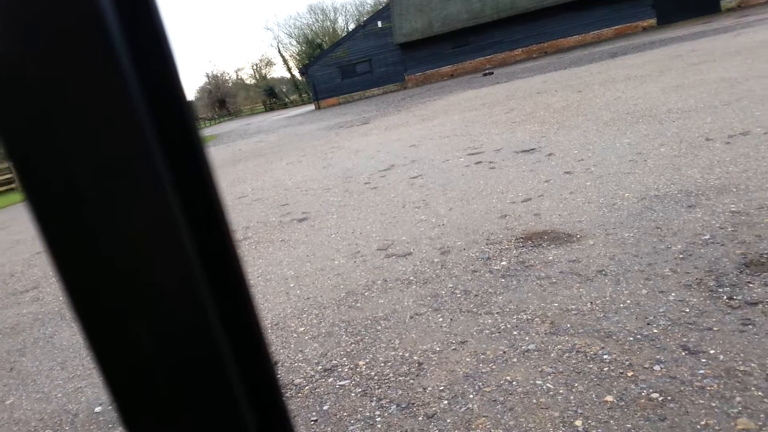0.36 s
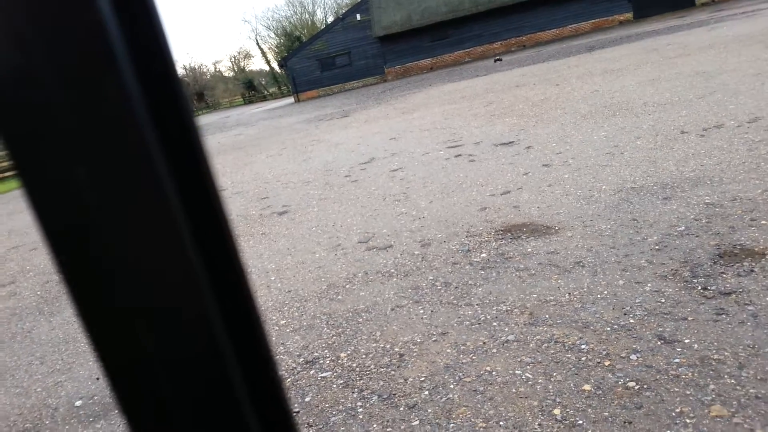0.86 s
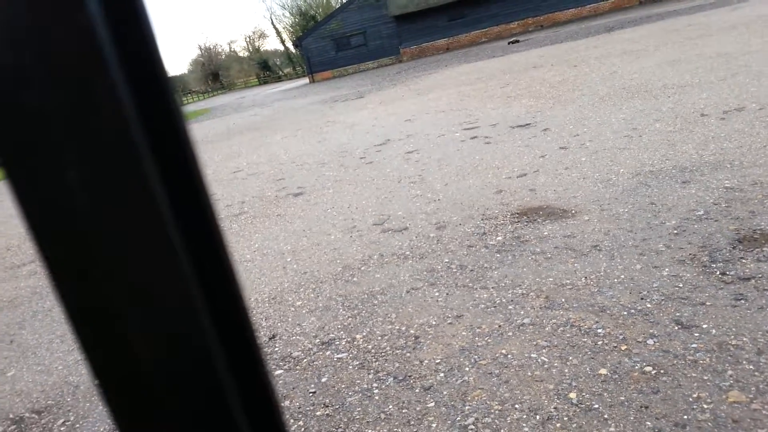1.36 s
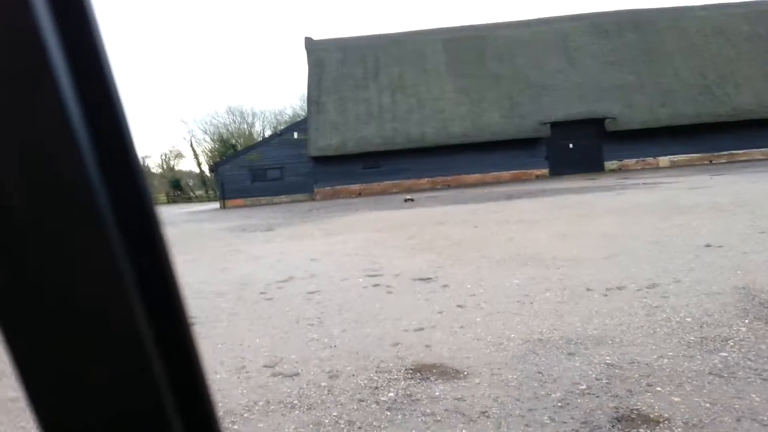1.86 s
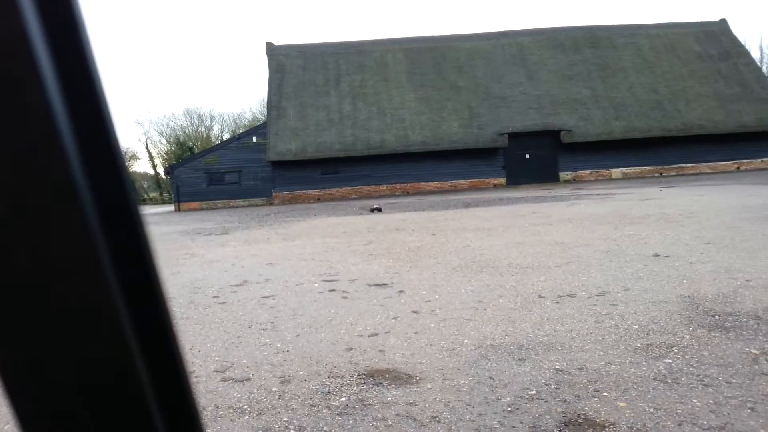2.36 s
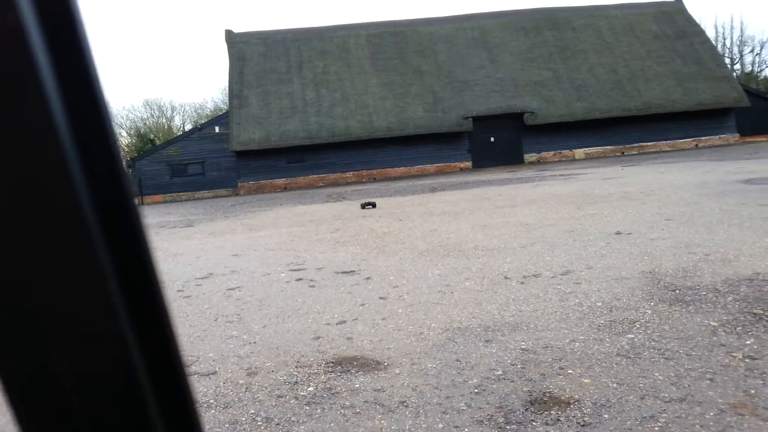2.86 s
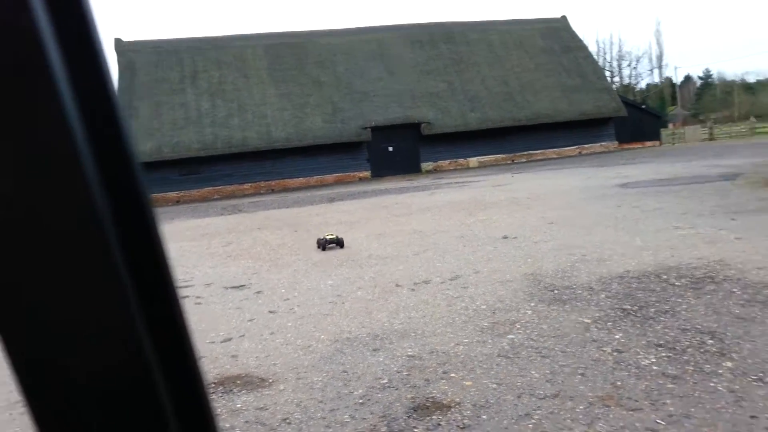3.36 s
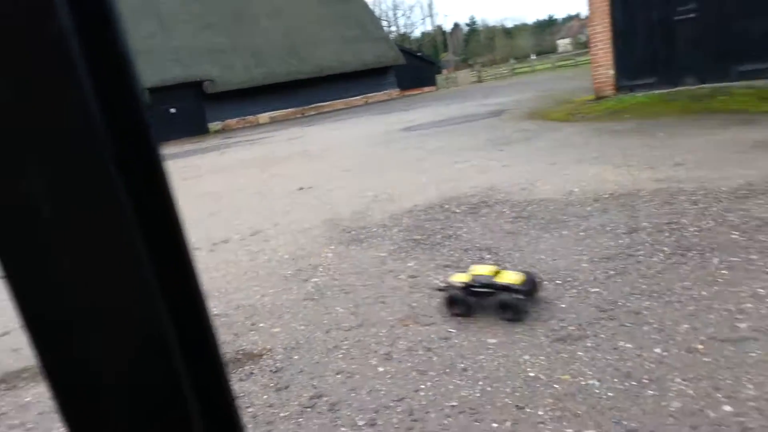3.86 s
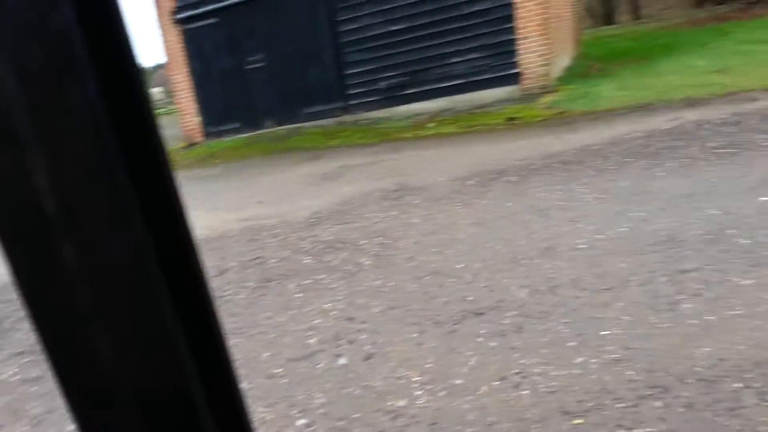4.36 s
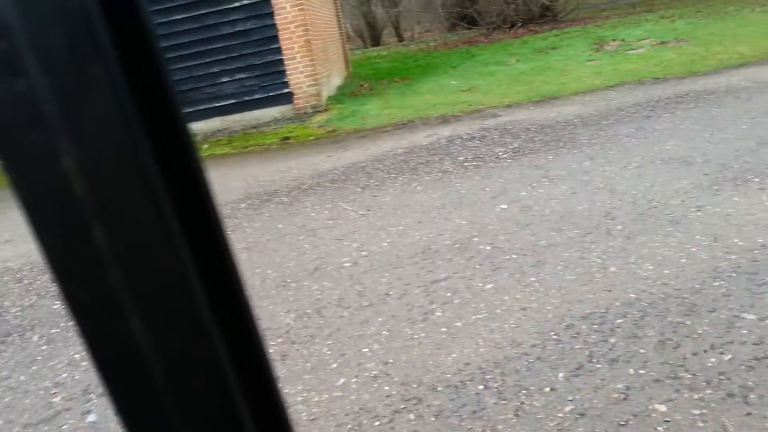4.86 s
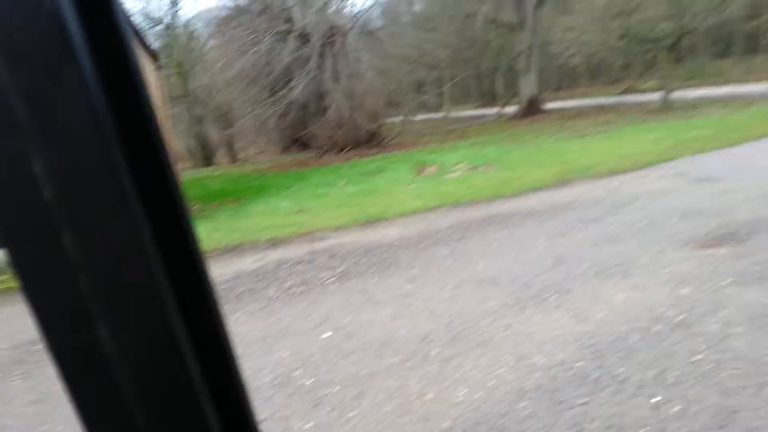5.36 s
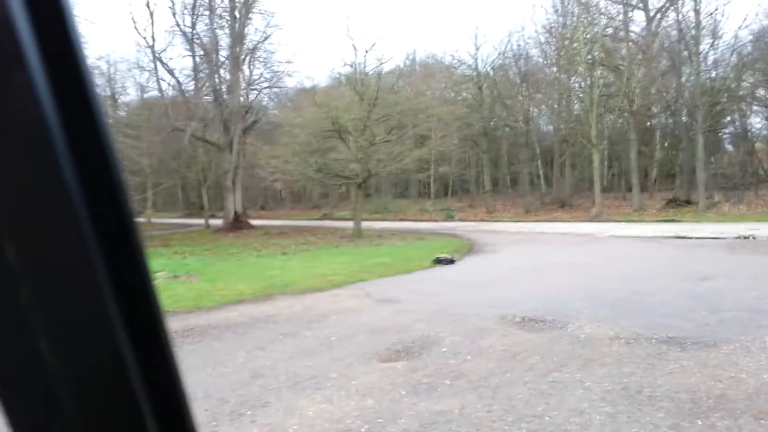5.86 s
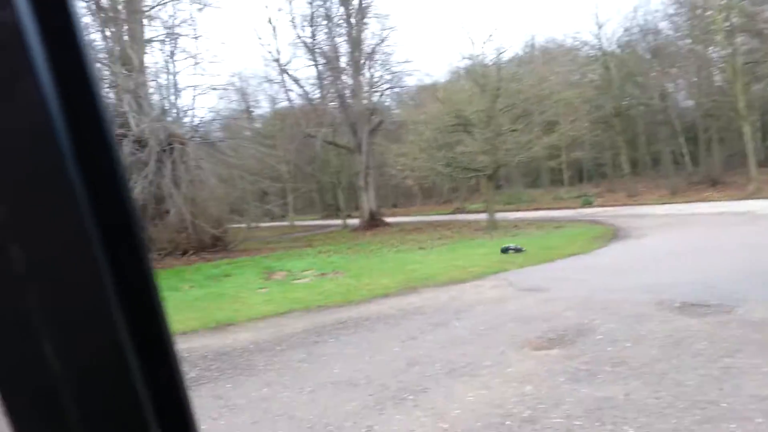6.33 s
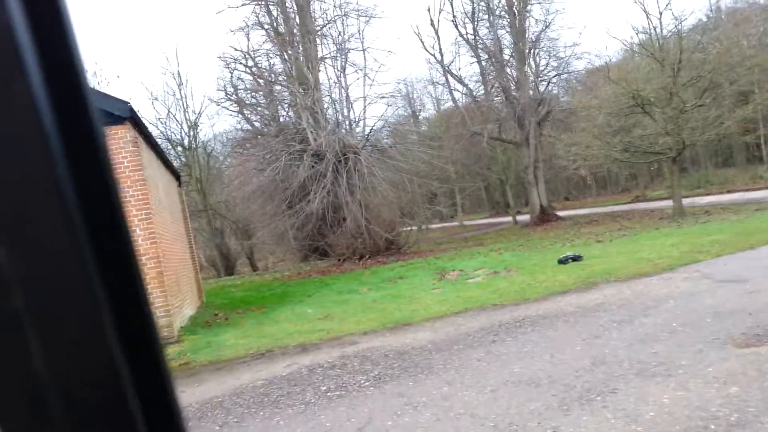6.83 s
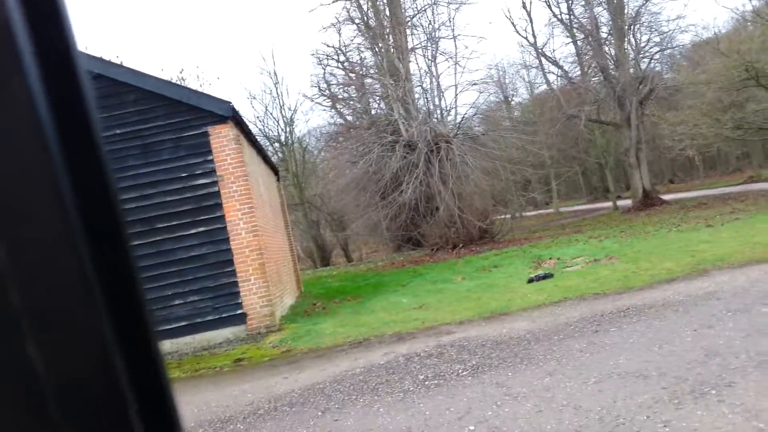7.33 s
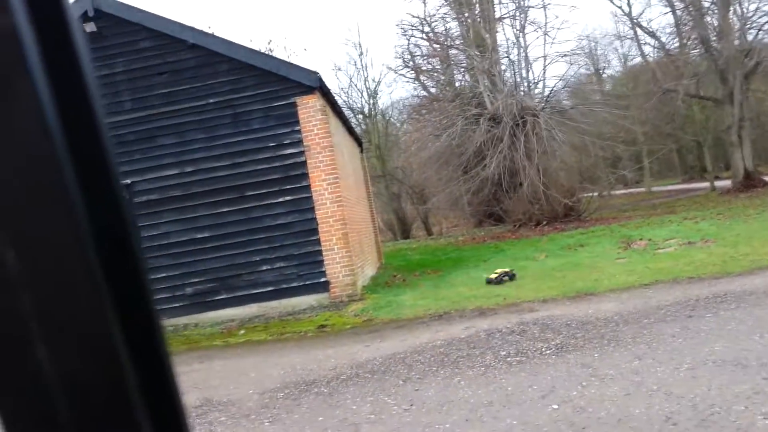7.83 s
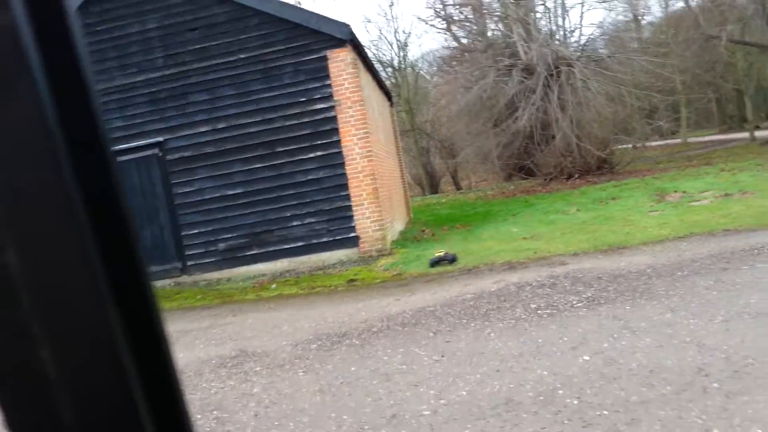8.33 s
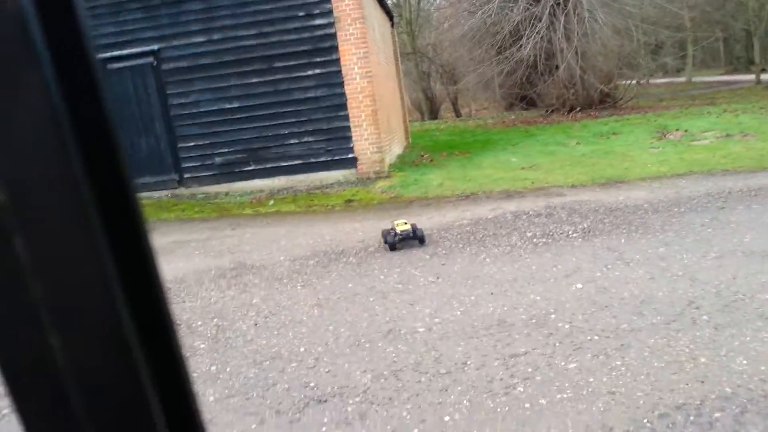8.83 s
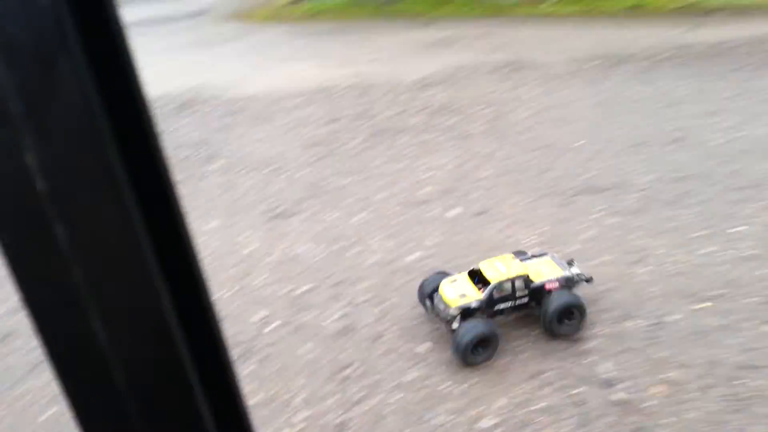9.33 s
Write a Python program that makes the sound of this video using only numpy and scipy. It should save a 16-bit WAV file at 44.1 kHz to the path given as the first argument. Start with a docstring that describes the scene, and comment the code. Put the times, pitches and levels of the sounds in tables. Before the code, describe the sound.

Small electric toy truck laps a gravel yard outdoors, tyres grinding stones, plastic body rattling, gears whining, wind puffing on the microphone.

```python
"""Toy truck on a gravel yard

A remote-controlled toy truck laps a gravel yard, passes close to a hand-held phone, turns on grass and comes back.
Tyres crunch stones as filtered cracks and noise; bumps knock the plastic body and set off a dying rattle.
Gear whines and rough sliding bands are wavering tones; clicks and faint high hiss are short rings in noise.
Light wind rumbles and puffs on the two microphones, and the hand round them colours their sound."""
import sys
import numpy as np
from scipy import signal
from scipy.fft import rfft, irfft, next_fast_len
from scipy.io import wavfile
from scipy.ndimage import uniform_filter1d

SR = 44100
rng = np.random.default_rng(int(sys.argv[2]) if len(sys.argv) > 2 else 0)


def inscribe(sig):
    """Save sig as 16-bit PCM at rate SR to the path in sys.argv[1].

    A 1-D sig is mono; a 2-D sig holds one channel per row.
    Samples are clipped to [-1, 1] before scaling.
    """
    pcm = np.round(np.clip(np.atleast_2d(sig).T, -1, 1) * 32767)
    wavfile.write(sys.argv[1], SR, pcm.astype(np.int16))


def invert_db(level):
    """Linear amplitude ratio for a level in decibels (20 dB per decade), elementwise."""
    return 10 ** (np.asarray(level, dtype=float) / 20)


N = 427769

# spectrum of grit, for tyres and rattles: f/Hz, relative density/dB per Hz
GRIT_SPECTRUM = [(40, -61), (100, -71), (180, -3), (270, 2), (370, -5.5), (520, 2.5), (760, 1), (1000, 3.5),
                 (2600, -1.5), (4000, -10.5), (7000, -27.5), (9000, -33), (12000, -36.5), (15000, -47)]


def evened(x):
    """Scales to rms 1."""
    return x / np.sqrt(np.mean(x ** 2) + 1e-20)


def read(points, hz):
    """Reads a spectrum on a log-frequency axis."""
    f, value = np.transpose(points)
    return np.interp(np.log(hz + 1), np.log(f + 1), value)


def add(mix, s, sound):
    """Mixes a sound in at time s."""
    part = mix[..., round(s * SR):][..., :sound.shape[-1]]
    part += sound[..., :part.shape[-1]]


def band(x, lo_hz, hi_hz):
    """Band-pass."""
    return signal.sosfilt(signal.butter(2, [lo_hz, hi_hz], "band", fs=SR, output="sos"), x)


def drift(shape, span):
    """Slow random wander of rms 1, smoothed twice over span samples."""
    return evened(uniform_filter1d(uniform_filter1d(rng.standard_normal(shape), span), span))


def spectra(x):
    """Short-time spectra: frequencies, times, complex values."""
    return signal.stft(x, SR, nperseg=512, noverlap=384)


def air(same=0.057):
    """Far country murmur and microphone hiss: shaped noise, nearly unrelated in the two ports."""
    # spectrum of the open air: f/Hz, relative density/dB per Hz
    murmur = [(18, -50), (30, -20), (147, -8), (460, -3), (928, -2.5), (1340, -8.5), (1600, -12),
              (4900, -21.5), (13900, -23), (15000, -35)]
    noise = rng.standard_normal((3, N))
    noise = noise[:2] + same * noise[2]
    size = next_fast_len(N)
    f = np.fft.rfftfreq(size, 1 / SR)
    shaped = irfft(rfft(noise, size) * invert_db(read(murmur, f)), size)[:, :N]
    return invert_db(-44.5) * evened(shaped)


def buffet():
    """Very low pressure swings of the breeze: low-band noise, unrelated in the two ports."""
    # slow buffeting on the microphones: t/s, level/dB
    swells = [(0, -62), (3.15, -76), (3.38, -38), (3.48, -59), (3.73, -41.5), (5.3, -52), (6.18, -50),
              (6.5, -54), (7.94, -58), (8.11, -48), (8.45, -53), (9.7, -54)]
    s, db = np.transpose(swells)
    noise = band(rng.standard_normal((2, N)), 54, 180)
    return evened(noise) * invert_db(np.interp(np.arange(N) / SR, s, db))


def wind(lumpy_db=4, swing_db=5):
    """Lumpy low rumble, unrelated in the two ports, and single dying puffs of air."""
    # breeze on the ports: t/s, rumble level before swing and lean/dB
    breeze = [(5.3, -57), (5.39, -34), (5.7, -48), (5.83, -28.5), (5.97, -61), (6.21, -37), (6.5, -49),
              (6.94, -50), (7.4, -46), (8.05, -61), (8.3, -40), (8.35, -47)]
    # puffs on a port: t/s, peak averaged over the ports/dB, f/Hz, left re right/dB, length/cycles
    gusts = [(5.437, -19, 267, -9, 2), (5.468, -20, 223, -23, 0.9), (5.476, -19, 196, -23, 1.2),
             (5.489, -16, 275, -22, 1.2), (5.511, -5, 280, -34, 1.3), (5.525, -11, 261, 6, 1.4),
             (5.547, -9.5, 245, -26, 1.3), (5.793, -24, 269, 5, 2.7), (5.87, -13, 181, -10, 0.52),
             (5.908, -16.5, 240, -22, 0.92), (5.922, -15, 382, -25, 0.6), (5.951, -10, 327, -36, 1.5),
             (6.252, -24, 345, -21, 1.9), (6.314, -25, 300, -26, 2), (6.952, -20, 155, 13, 0.53),
             (7.228, -22.5, 240, 27, 1.06), (7.27, -23.5, 263, -28, 0.88), (7.555, -24, 192, -23, 0.9),
             (8.043, -33, 149, 24, 1.4), (8.115, -29, 135, -13, 1.4), (8.221, -28, 145, 9, 1.3),
             (8.258, -17, 304, 21, 1.1), (8.299, -28, 215, 21, 1.1)]
    s, db = np.transpose(breeze)
    level = np.interp(np.arange(N) / SR, s, db, -90, -90)
    level = level + swing_db * drift((2, N), 3000) + [[-3], [2.5]]  # leans to the right port
    lumps = invert_db(lumpy_db * drift((2, N), 600))
    mix = evened(band(rng.standard_normal((2, N)), 100, 265) * lumps) * invert_db(level)
    for s, db, hz, pan_db, cycles in gusts:
        cycles = max(cycles, .5)
        u = np.arange(int(cycles * 3 / hz * SR)) / SR * hz  # time in cycles
        puff = np.sin(2 * np.pi * u) * u * np.exp(-2.5 * u / cycles)
        gains = invert_db([pan_db / 2, -pan_db / 2])
        add(mix, s, np.outer(2 * gains / gains.sum(), invert_db(db) * puff / abs(puff).max()))
    return mix


def clicks_and_hiss():
    """Clicks and faint swells of very high hiss: a short dying ring inside a band of noise."""
    # short sounds, levels ahead of the ports: t/s, peak level/dB, f/Hz, t60/s
    shorts = [(1.1794, -28, 4720, .02), (3.845, -32, 13500, .03), (4.05, -28, 12500, .06),
              (4.175, -34, 13000, .05), (4.29, -31, 13000, .05), (6.163, -30, 3600, .02),
              (7.181, -31, 1300, .02), (7.236, -32, 2200, .025), (7.82, -40, 13500, .03),
              (8.41, -40, 13500, .04), (9.6135, -3, 5000, .018)]
    mix, t = np.zeros(N), np.arange(3000) / SR
    for s, db, hz, t60 in shorts:
        noise = evened(band(rng.standard_normal(len(t)), .75 * hz, min(1.8 * hz, 15000)))
        decay = invert_db(-60 * t / max(t60, .005))
        attack = np.minimum(t / (.07 * t60), 1)
        ring = (np.sin(2 * np.pi * hz * t) + noise) * decay * attack
        add(mix, s, invert_db(db) * ring / abs(ring).max())
    return mix


def whines(flutter_db=2.5, rasp=.55, slip=.7, lost_db=-10, grip=.7, slide_db=-.25, snatch=1.6, snatch_hz=27):
    """Gear whines and rough sliding bands, as tones that warble, sag at random and rasp."""
    # one table a tone or band; several may sound together. The last two stand for rough, sliding bands
    # of tyre noise coloured by a ground echo. Levels before flutter: t/s, f/Hz, level/dB
    tones = [
        [(.54, 959, -57), (.625, 1090, -33), (.665, 1300, -36), (.71, 1983, -29), (.78, 2386, -40),
         (.84, 2620, -41), (.89, 1960, -28), (.955, 2450, -38), (1.12, 2260, -51), (1.16, 2263, -33),
         (1.2, 2410, -60), (1.4, 2890, -41)],
        [(2.2, 3150, -43), (2.4, 4400, -45), (2.46, 4160, -43), (2.51, 4620, -54), (2.62, 3800, -37),
         (2.72, 4700, -45), (3.12, 5050, -52)],
        [(2.9, 1348, -29), (3.13, 1354, -33.5), (3.27, 1442, -24.5), (3.334, 1475, -18.5), (3.4, 1540, -29)],
        [(5.92, 1352, -44), (6.15, 1285, -27.5), (6.232, 1810, -29.5), (6.27, 1576, -30), (6.344, 1818, -31.5),
         (6.43, 1884, -28.5), (6.455, 1900, -40)],
        [(6.47, 2220, -42), (6.57, 2300, -49), (6.64, 2830, -58), (6.8, 3070, -40.5), (6.85, 3430, -50),
         (6.885, 2930, -39), (7.03, 2850, -53)],
        [(6.5, 5200, -57), (6.76, 5450, -54), (7.03, 5580, -59)],
        [(6.7, 653, -48), (6.73, 705, -30.5), (6.8, 709, -41), (6.86, 867, -36), (6.94, 850, -58)],
        [(7.36, 1700, -45), (7.425, 2850, -44), (7.47, 2480, -48), (7.52, 2970, -45), (7.6, 2674, -38.5),
         (7.69, 3570, -44), (7.74, 2870, -37.5), (7.8, 3500, -38), (7.84, 3000, -48), (7.92, 2500, -57)],
        [(8.27, 1980, -36), (8.328, 2500, -31), (8.36, 3400, -33), (8.38, 3900, -36), (8.405, 3800, -40),
         (8.425, 4250, -35), (8.477, 3500, -35), (8.497, 3950, -40), (8.518, 3550, -33), (8.555, 4200, -35),
         (8.582, 3600, -30), (8.612, 4220, -29), (8.64, 4500, -35), (8.69, 5050, -34)],
        [(9.2, 3700, -41), (9.235, 3970, -22), (9.33, 3990, -29), (9.38, 3700, -48), (9.45, 3500, -46),
         (9.55, 3693, -47), (9.62, 3600, -26), (9.7, 3480, -38)],
        [(9.2, 2144, -35), (9.3, 2055, -21), (9.45, 2320, -24), (9.59, 2450, -15.5), (9.7, 2250, -33)],
    ]
    # for each tone: lower neighbour re main tone/dB, octave re main tone/dB, scale of the pitch wobble/share
    strands = [(-16, -24, 0.02), (-7, -20, 0.0108), (-18, -48, 0.0071), (-10.5, -23, 0.011),
               (-23.5, -14, 0.0244), (-25, -40, 0.023), (-29, -4.5, 0.02), (-13, -10, 0.0225),
               (-4.5, -12, 0.01184), (-13, -16, 0.04), (-3.5, -41, 0.042)]
    mix = np.zeros(N)
    for rows, (pair_db, octave_db, wobble) in zip(tones, strands):
        s, hz, db = np.transpose(rows)
        t = np.arange(s[0], s[-1], 1 / SR)
        warble = snatch * np.sin(2 * np.pi * snatch_hz * t + drift(len(t), 3000))
        waver = wobble * (drift(len(t), 200) + slip * drift(len(t), 600) + warble)
        turns = np.cumsum(np.interp(t, s, hz) * (1 + waver)) / SR
        loose = np.clip(2 * (drift(len(t), 350) - grip), 0, 1)  # 1 = fully sagged
        shake = invert_db(flutter_db * drift(len(t), 500) + lost_db * loose)
        shake *= 1 + rasp * drift(len(t), 70)
        slide = abs(np.gradient(np.interp(t, s, np.log2(hz)), t))  # octaves a second
        shake *= invert_db(slide_db * slide)  # fainter while the pitch slides
        orders = (.665, pair_db), (1, 0), (2, octave_db)  # (pitch ratio, dB)
        tone = sum(invert_db(d) * np.sin(2 * np.pi * k * turns) for k, d in orders)
        fade = signal.windows.tukey(len(t), .06)
        add(mix, s[0], tone * shake * invert_db(np.interp(t, s, db)) * fade)
    return np.sqrt(2) * mix


def bumps(cycles=0.77, rattle_t60_s=0.13):
    """Each bump is a dead plastic knock, dying within a few cycles, and a short dying rattle."""
    # wheels hitting stones and ruts, levels ahead of the ports:
    # t/s, knock peak/dB, knock f/Hz, rattle setting re knock/dB, rattle tilt/dB per octave
    hits = [(0.383, -26, 1080, 0, -2), (1.677, -17.5, 1590, -14, 2), (1.92, -22, 2160, 2, -3.5),
            (2.31, -24, 2300, 4.5, -1), (2.559, -17, 2300, -15, 5), (3.191, -22.5, 2400, 4.5, -2),
            (3.61, -4, 1450, -4, -0.5), (4.726, -7, 2750, -8.5, 6.5), (4.877, -29, 2550, 5, 4),
            (5.035, -14.5, 2550, 3, 0), (5.232, -17, 2400, 3, -1), (5.391, -26.5, 2000, 6.5, 1.5),
            (5.5, -29, 2400, -5, 13), (5.953, -11, 610, -23, -15), (6.162, -18, 942, -22, 5),
            (6.451, -33.5, 902, 14.5, -3), (6.641, -17.5, 960, -8.5, 2), (6.842, -27, 837, -12, 11),
            (7.18, -32, 1200, -3, -11), (7.233, -29, 900, -9, 2), (7.357, -33.5, 690, 6, -1),
            (7.629, -16, 990, -20, 8), (7.752, -16, 1020, -17, 11), (7.836, -10, 835, -15.5, 1),
            (7.857, -20, 953, -20, -5), (7.887, -22.5, 795, -7, 6), (8.249, -22, 1030, -7, 8),
            (8.311, -18, 2420, -9.5, 13), (8.509, -16, 990, -7.5, 22), (8.631, -12.5, 1080, -4.5, 7),
            (8.695, -9, 2610, 4.5, 4), (8.959, -11, 1200, 2, -5), (9.151, -9, 1510, 1.5, 3.5),
            (9.278, -1, 1020, -6.5, 5)]
    mix, t = np.zeros(N), np.arange(6000) / SR
    f = np.fft.rfftfreq(len(t), 1 / SR)
    for (s, db, hz, rattle_db, tilt_db), noise in zip(hits, rng.standard_normal((len(hits), len(t)))):
        knock = np.sin(2 * np.pi * hz * t) * hz * t * np.exp(-hz * t / cycles)
        colour = invert_db(read(GRIT_SPECTRUM, f) + tilt_db * np.log2((f + 200) / 1000))
        rattle = evened(irfft(rfft(noise) * colour, len(t))) / 2
        rattle = rattle * invert_db(rattle_db - 60 * t / rattle_t60_s) * np.minimum(t / 0.0021, 1)
        add(mix, s, invert_db(db) * (knock / abs(knock).max() + rattle))
    return mix


def tyres(stones_per_s=2500, spread_db=3.0, rush=0.99, judder_db=1.5, patchy_db=2.0, lurch_db=0.85):
    """Stones crack at random under the tyres over a dense rush; returns short-time spectra."""
    # where rumble, body, crunch and hiss hand over: f/Hz
    split_hz = (400, 1400, 3300)
    # colour of the ground under the wheels:
    # t/s, crunch re body knock/dB, stone hiss re loudness/dB, ground rumble re loudness/dB
    ground = [(0, -1, -27, -6.5), (2.1, 5, -28, -7.5), (2.4, 6, -16, -9), (3.3, 3, -4.5, -12),
              (3.83, 3.5, -13, -13), (4.05, -2, -12, -11.5), (4.3, 4, -7, -6), (4.7, -2.5, -3.5, -0.5),
              (5.1, -0.5, -9.5, -7), (5.7, -3, -16.5, -12.5), (6.2, -11.5, -18.5, -36),
              (7.0, -21, -15, -22), (7.3, -19, -20.5, -26), (7.7, -29, -6, -28), (8.2, -8, -22, -7),
              (8.35, -4.5, -8.5, -22.5), (8.9, 4.5, -8.5, -9), (9.3, 1, -11.5, -11), (9.7, -11.5, -6.5, -6)]
    # loudness as the truck nears, leaves, slows and speeds up, ahead of the ports: t/s, level/dB
    roll = [(0, -36), (.23, -35.5), (.55, -40.5), (.72, -36.5), (1.12, -33.5), (1.4, -35), (3.28, -27),
            (3.34, -20.5), (3.53, -24), (3.84, -13.5), (4.1, -15.5), (4.69, -30.5), (4.74, -22.5),
            (4.81, -28), (5.46, -30.5), (5.52, -25.5), (5.81, -35.5), (5.95, -30.5), (6.01, -35.5),
            (6.2, -34.5), (6.6, -34.5), (7.03, -34.5), (7.1, -37), (7.34, -45.5), (7.38, -36),
            (7.62, -29.5), (7.71, -32), (7.83, -27.5), (7.93, -36), (8.22, -49.5), (8.27, -31.5),
            (8.68, -26), (8.71, -17.5), (8.91, -19.5), (9.05, -22), (9.16, -14), (9.31, -11.5),
            (9.7, -16.5)]
    size = invert_db(spread_db * np.minimum(rng.exponential(1, N), 5)) * rng.choice([-1., 1.], N)
    cracks = size * (rng.random(N) < stones_per_s / SR)
    drive = evened(cracks) + rush * rng.standard_normal(N)
    drive = drive * invert_db(judder_db * drift(N, 500))  # the chassis bounces
    hz, t, z = spectra(evened(drive))
    s, *columns = np.transpose(ground)
    crunch_db, hiss_db, rumble_db = (np.interp(t, s, c) for c in columns)
    body = 1 / np.sqrt(1 + invert_db(crunch_db) ** 2)  # knock and crunch share the loudness
    shares = [invert_db(rumble_db), body, body * invert_db(crunch_db), invert_db(hiss_db)]
    above = [1, *(1 / (1 + (f / (hz + 1)) ** 6) for f in split_hz), 0]
    edges = (120, *split_hz, 7500)
    grit = invert_db(read(GRIT_SPECTRUM, hz))
    level = 0
    for k, share in enumerate(shares):
        inside = (hz > edges[k]) & (hz < edges[k + 1])
        colour = (above[k] - above[k + 1]) * grit / np.sqrt(np.mean(inside * grit ** 2))
        lurch = invert_db(lurch_db * drift(len(t), 16))  # each part comes and goes over uneven ground
        level = level + np.outer(colour, share * lurch)
    patches = uniform_filter1d(rng.standard_normal(z.shape), 3, 0)
    patches = evened(uniform_filter1d(patches, 14, 1))
    return z * level * invert_db(np.interp(t, *np.transpose(roll)) + patchy_db * patches)


def slap(z, low_hz=900, high_hz=4500):
    """The sound and its short echo comb the middle of the spectrum."""
    # echo off a hard surface while the truck is close: t/s, delay/ms, mid-band strength/0-1
    surface = [(3.6, .8, 0), (3.85, .82, .3), (4.05, .9, 0), (9.05, 1.05, 0), (9.25, 1.0, .65),
               (9.4, .92, .55), (9.56, .81, .65), (9.7, .9, .55)]
    hz, t = np.fft.rfftfreq(512, 1 / SR), np.arange(z.shape[1]) * 128 / SR
    s, delay_ms, strength = np.transpose(surface)
    strength = np.clip(np.interp(t, s, strength), 0, 1)
    edges = (1 + (low_hz / (hz + 1)) ** 4) * (1 + (hz / high_hz) ** 4)
    strength = strength / edges[:, None]
    late = np.exp(-2j * np.pi * np.outer(hz, np.interp(t, s, delay_ms)) / 1000)
    return z * (1 + strength * late) / np.sqrt(1 + strength ** 2)


def ports(z, scatter_db=-14, unlike_hz=3000):
    """Two microphones: delay by bearing, colour of the hand, and scattered sound that differs between them."""
    # bearing of the truck:
    # t/s, left lead before the factors below/ms, depth of the hand's colour/0-1, factor on its frequencies
    bearing = [(0, 0.068, 0.6, .94), (1.5, 0.08, .85, 1.05), (2.0, -0.036, 0.78, .94),
               (3.3, -0.043, 1, 1.066), (3.901, -.016, 1, 1.06), (4.15, 0.33, 0.65, 1.14),
               (4.35, 0.42, 0.3, 1.04), (5.0, 0.38, .7, 1.15), (5.4, 0.28, 0.98, 1.07),
               (6.0, 0.017, 1, 0.97), (6.4, .12, 0.86, 0.987), (7.3, .13, 1, 1), (9.0, 0.017, 1, 1.05),
               (9.4, .11, 0.96, 1.055), (9.7, 0.046, 0.87, 1.11)]
    # humps and dips of each microphone in the hand: f/Hz, width/Hz, level at full depth/dB
    left_port = [(970, 250, 1), (1360, 184, -6.5), (2170, 1200, 1), (2450, 110, 3), (3260, 4400, -2),
                 (13060, 1800, 6)]
    right_port = [(724, 30, -29), (1260, 163, -15.5), (1707, 380, -8.5), (2550, 1500, 5.5),
                  (3067, 205, -14), (3700, 320, 1), (4750, 680, -2), (5040, 980, 3.5)]
    hz, t = np.fft.rfftfreq(512, 1 / SR), np.arange(z.shape[1]) * 128 / SR
    s, *columns = np.transpose(bearing)
    lead_ms, depth, stretch = (np.interp(t, s, c) for c in columns)
    # scatter grows with frequency and with the depth of the hand's colour
    scattered = invert_db(scatter_db) * np.outer(1 + hz / unlike_hz, .15 + depth)
    smear = abs(uniform_filter1d(abs(z) ** 2, 12, 1, origin=5)) ** .5  # echoes trail behind
    out = []
    for side, port in ((0.76, left_port), (-1.153, right_port)):  # side: half-leads, + early, - late
        db = sum(d * np.exp(-2 * ((hz[:, None] / stretch - f) / w) ** 2) for f, w, d in port)
        echo = 2 * scattered * smear * np.exp(2j * np.pi * rng.random(z.shape))
        direct = z * np.exp(side * 1j * np.pi * np.outer(hz, lead_ms) / 1000)
        out.append((direct + echo) * invert_db(depth * db) / np.sqrt(1 + scattered ** 2))
    return signal.istft(np.array(out), SR, nperseg=512, noverlap=384)[1][:, :N]


def scene():
    """Truck through the two ports, plus wind and air."""
    others = spectra(bumps() + whines() + clicks_and_hiss())[2]
    truck = slap(tyres()) + others  # slap() takes the tyres alone
    return ports(truck) + wind() + air()


def treble_gate(x, from_hz=7000, below_db=-17, follow=0.73, knee_db=-66):
    """Faint treble drops out in patches, below a limit that rises with the upper middle."""
    hz, t, z = signal.stft(x, SR, nperseg=2048, noverlap=1024)
    power_db = 10 * np.log10(uniform_filter1d(abs(z) ** 2, 15, 1) + 1e-20)
    middle = (abs(z[:, (hz > 3000) & (hz < from_hz)]) ** 2).mean(1)
    loud_db = 10 * np.log10(uniform_filter1d(middle, size=3, axis=1) + 1e-20)
    limit_db = knee_db + below_db + follow * (loud_db - knee_db)
    keep = (power_db > limit_db[:, None]) | (hz < from_hz)[:, None]
    return signal.istft(z * keep, SR, nperseg=2048, noverlap=1024)[1][:, :N]


def roll_off(x):
    """The treble ends steeply here."""
    return signal.sosfilt(signal.butter(12, 15380, fs=SR, output="sos"), x)


def record(dry, bass_hz=100, knee=1.2):
    """The loudest peaks round off, the microphones lose deep bass, buffeting joins and the input overloads."""
    rounded = knee * np.tanh(dry / knee)
    thin = signal.sosfilt(signal.butter(2, bass_hz, "high", fs=SR, output="sos"), rounded)
    mix = treble_gate(np.clip(thin + buffet(), -1, 1))
    return roll_off(mix)


dry = scene()
out = record(dry)
inscribe(out)
```